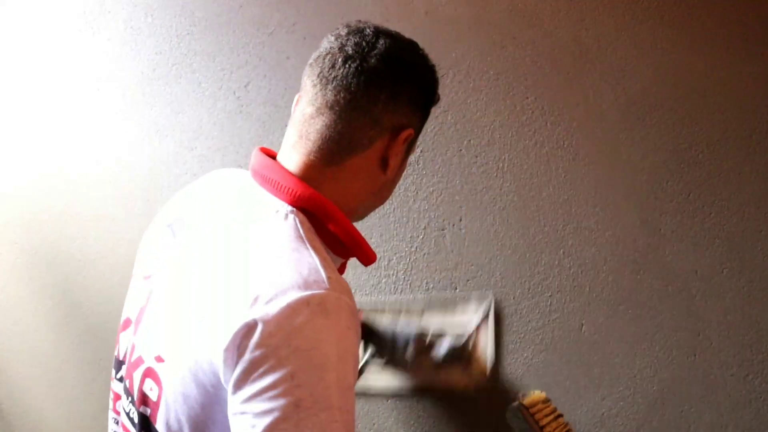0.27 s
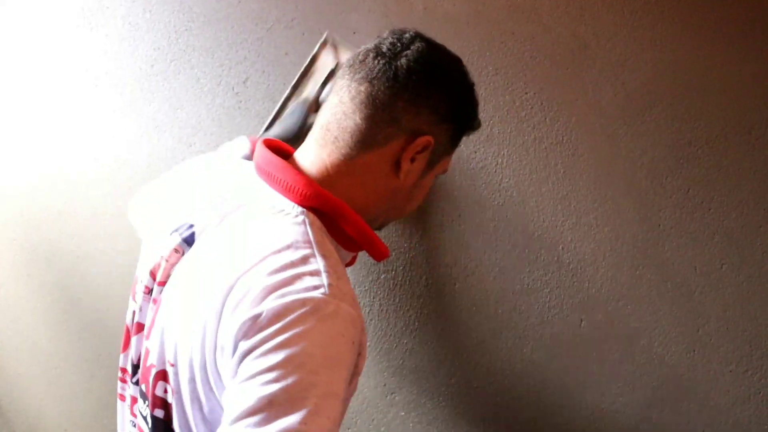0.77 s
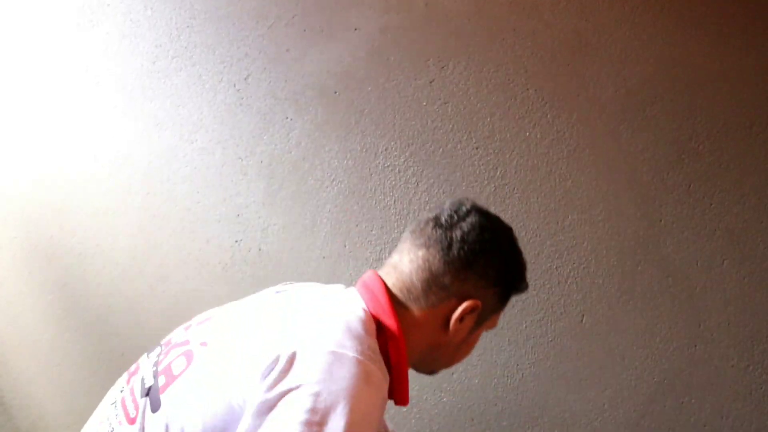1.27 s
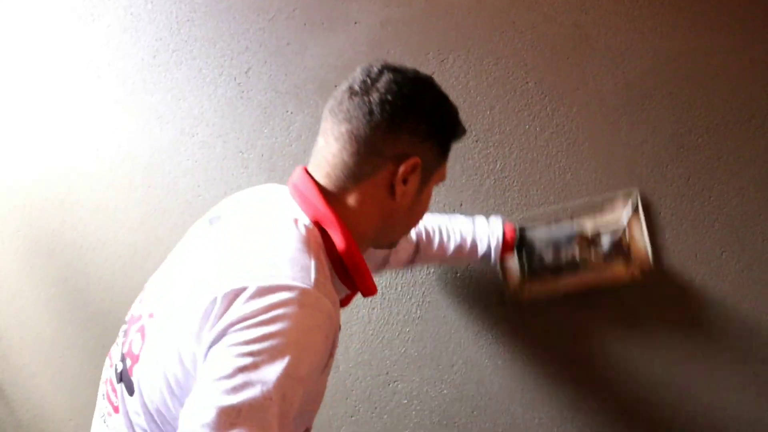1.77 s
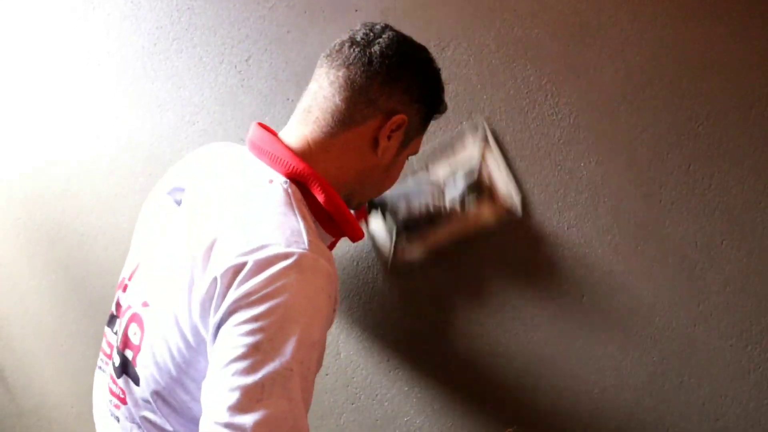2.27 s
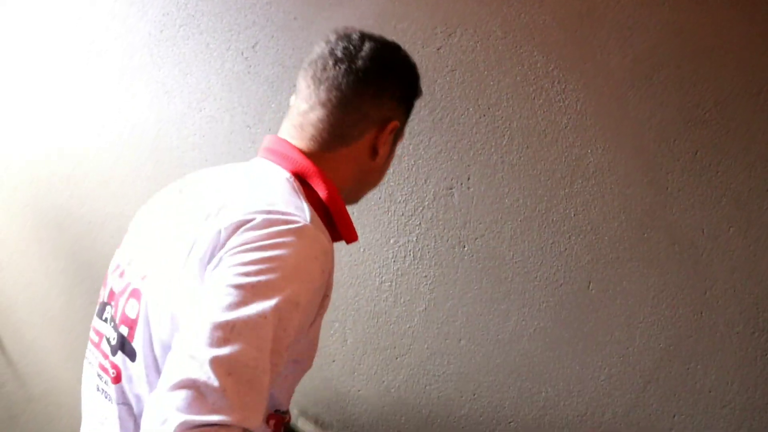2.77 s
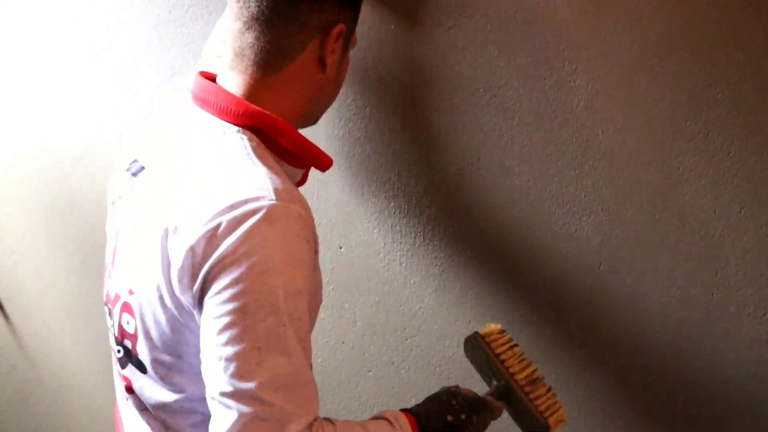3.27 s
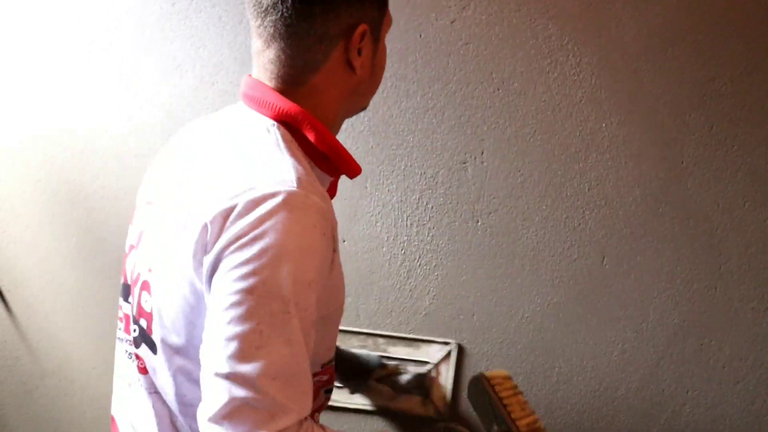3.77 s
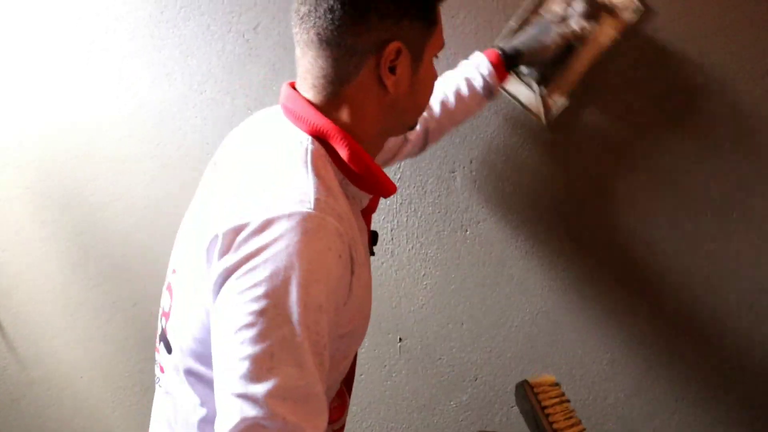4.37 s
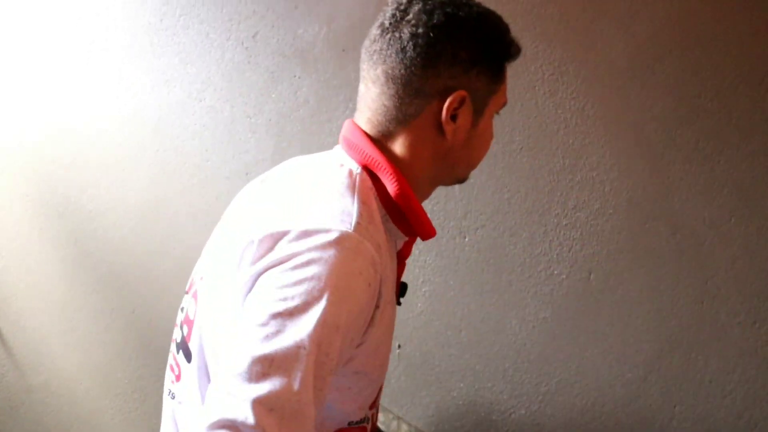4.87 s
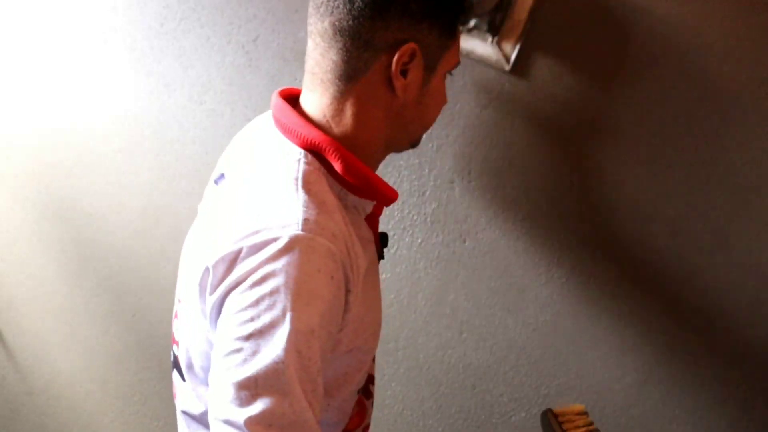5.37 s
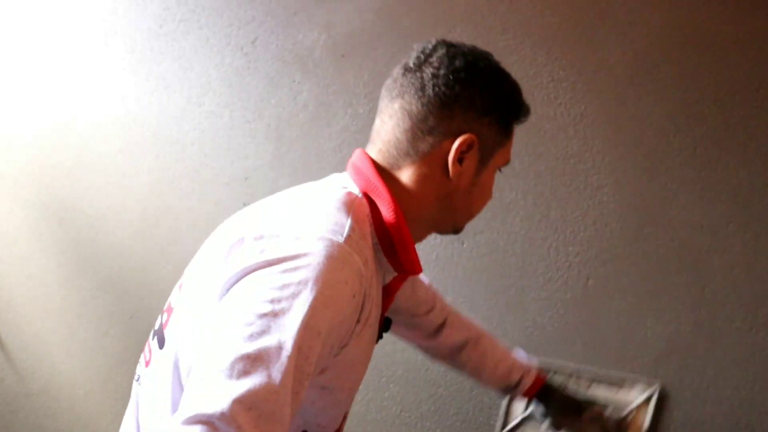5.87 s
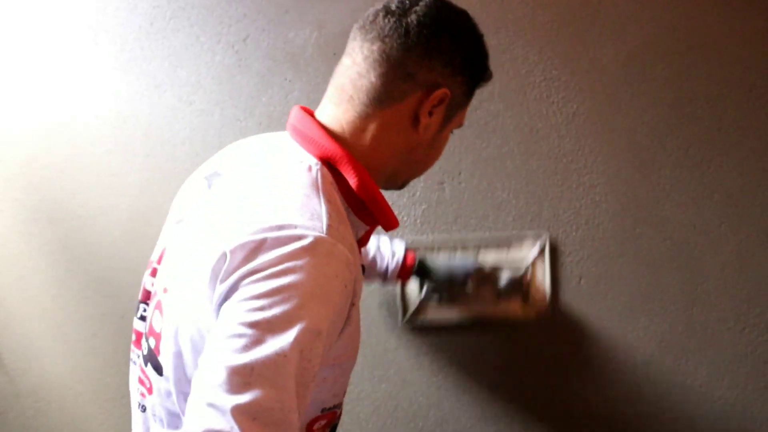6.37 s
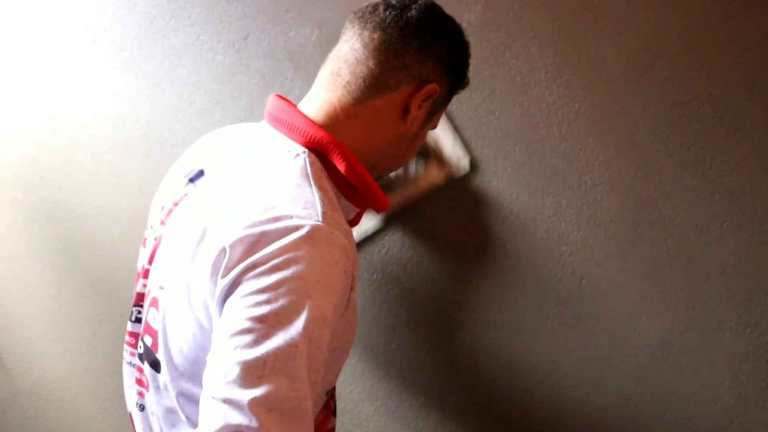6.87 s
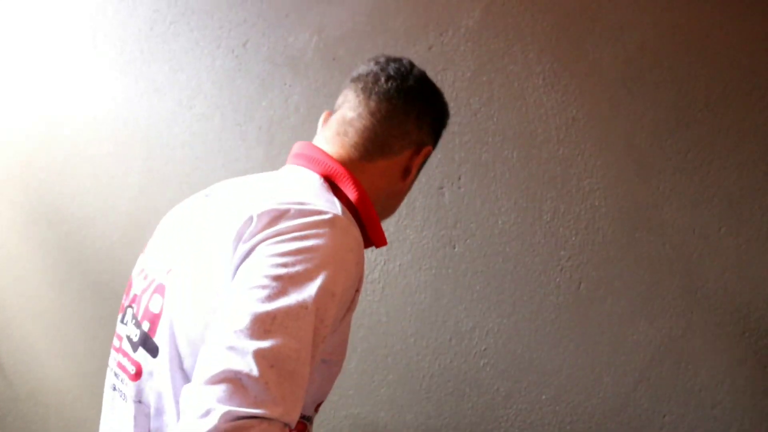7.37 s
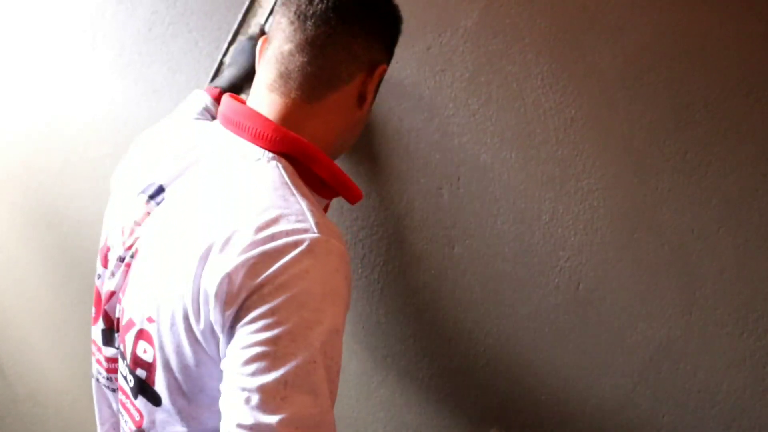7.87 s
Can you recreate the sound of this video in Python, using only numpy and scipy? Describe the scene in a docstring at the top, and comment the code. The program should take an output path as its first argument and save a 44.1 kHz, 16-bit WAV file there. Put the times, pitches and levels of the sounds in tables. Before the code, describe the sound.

Rhythmic gritty scraping on a plaster wall: strokes alternate up and down, irregular in length and force, some dull and hollow, others bright and sandy. Occasional hard grains snap under the edge. Gentle cloth thuds touch the chest microphone. A quiet bare room gives short reflections, and the final stroke grows markedly louder and harsher. The left side carries everything; the right is nearly silent.

```python
"""A gritty rasp swells and fades as a coarse hand float sweeps back and forth over fresh render in a bare room.
Friction is modelled as random grain impulses: filtered for rasp, hiss and grumble, or exciting the plate's modes
for a hollow ring. Decaying tones with noise crumbs make the sharp ticks of snagging grains.
Arm speed and the lean of the hand set the levels; a reflection and a sparse room tail follow.
A clip-on microphone on the plasterer's shirt, softly bumped, feeds the left channel; the right is nearly silent."""
import sys
import numpy as np
from scipy import signal
from scipy.fft import rfft, irfft
from scipy.io import wavfile
from scipy.ndimage import uniform_filter1d, map_coordinates

SR = 44100
rng = np.random.default_rng(int(sys.argv[2]) if len(sys.argv) > 2 else 0)


def dump(signal):
    """Clip the signal to [-1, 1] and save it as 16-bit WAV at the path in sys.argv[1]."""
    limited = np.clip(np.atleast_2d(signal).T, -1, 1)
    pcm = np.round(limited * 32767).astype(np.int16)
    wavfile.write(sys.argv[1], SR, pcm)


N = 358224
TIME = np.arange(N) / SR

# All levels in the tables are relative: later mixing gains apply.
# Strokes, upward and downward by turns: starting turn t/s, top speed t/s, share of speed kept through the turn
# (limited to 0.02-1), then at top speed rasp, plate ring, sharp sand, fine hiss and grumble level/dB
STROKES = [(-0.4, -0.17, 0.12, -28.5, -37, -26.0, -37, -49.0),
           (0.134, 0.285, 0.3, -26, -33, -26, -28, -46.5),
           (0.56, 0.948, 0.47, -27, -34.5, -32, -37.5, -53.5),
           (0.96, 1.12, 1.07, -27.5, -31.5, -31, -29.0, -52),
           (1.574, 1.818, 0.16, -31, -32.5, -28.5, -29.0, -44.5),
           (2.192, 2.328, 0.41, -24.5, -32.5, -28.5, -28.5, -46.5),
           (2.732, 3.105, 0.24, -30, -34.5, -24.5, -30, -46),
           (3.424, 3.66, 0.21, -27.5, -31.5, -29.0, -27, -43.5),
           (3.95, 4.168, 0.6, -27, -30.5, -26.5, -37.5, -44.5),
           (4.347, 4.5, 0.94, -29.5, -36.5, -35.5, -32, -54.5),
           (5.02, 5.212, 0.5, -28.5, -30.5, -28, -34, -40),
           (5.576, 5.77, 0.43, -32, -33, -32.5, -30.5, -48),
           (6.287, 6.49, 0.51, -24.5, -30.5, -28, -30.5, -39),
           (6.776, 7.017, 0.43, -31, -35, -28.5, -30, -47.5),
           (7.396, 7.708, 0.19, -24.5, -35.5, -25, -28.5, -42.5),
           (8.03, 8.31, 0.1, -17.5, -26.5, -15.5, -18.5, -48)]
LAST_TURN_S = 8.5  # where the last stroke ends
SPEED_POWER = 1.33  # speed follows a half sine to this power
# Response of each named layer to the arm: level/dB per tenfold speed, level/dB gained from foot to top of the sweep
ARM_RESPONSE = {"rasp": (17.7, 0.99), "plate": (15, .1), "sharp": (20.2, -2.4), "hiss": (29.3, -3.3),
                "grumble": (8.6, -7)}
# The hand leans on the float or eases off: centre t/s, half width t/s,
# change of rasp, plate ring, sharp sand and grumble level/dB
HAND_LEANS = [(0.288, 0.053, 2, 5, -2.5, 2), (0.787, 0.11, -3.5, -2.5, 3, 2),
              (1.179, 0.031, 3.5, 1.5, 3.5, 1.0), (1.295, 0.091, -2.5, -2, 1, -5),
              (1.984, 0.048, 5, 7.5, 3.5, 1), (2.328, 0.058, 0, 5.5, 1.0, -6),
              (2.434, 0.019, -0.5, 6.5, 1.0, 0.5), (3.086, 0.11, 6, 3.5, -1, 5),
              (3.331, 0.084, 3, -2, 1, -8), (3.638, 0.039, 1, 4.5, 5.5, 0), (4.527, 0.093, 2.5, 7, 4.5, 2),
              (5.317, 0.028, 4.5, 2.5, -0.5, 3), (5.5, 0.028, 6, -0.5, 0, 1),
              (5.73, 0.077, 9, 2.5, 3.0, -2.0), (6.586, 0.014, 3.5, 5, 3.5, -6),
              (6.683, 0.08, -2.5, 5.0, -0.5, 2), (6.969, 0.12, 5.5, 7, 1.5, 4),
              (7.833, 0.19, -3.5, 3.5, 1, 5), (8.025, 0.0096, -2, 0, 2, -7)]
# Modes of the float plate: f/Hz, level/dB, 60 dB decay time t/s
PLATE_MODES = [(670, -17, 0.15), (786, 9.5, 0.11), (875, 6.5, 0.13), (1230, -16, 0.09), (1320, -2, 0.085),
               (1490, 2, 0.13)]
# Gliding centre of the rasp's ringing core: t/s, f/Hz
RASP_CORE = [(0.0, 2500), (0.63, 2480), (0.83, 3140), (0.95, 2300), (1.87, 2920), (1.92, 2200),
             (3.12, 2820), (4.02, 2290), (4.12, 2840), (4.3, 1970), (5.27, 2600), (5.38, 1870),
             (5.59, 2480), (6.4, 2340), (6.53, 2760), (6.67, 2020), (7.78, 2860), (8.12, 2270)]
# Spectra of the contact sounds: f/Hz, level/dB (per Hz)
HOLLOW_SPECTRUM = [(300, -31), (450, -10.5), (650, -1.5), (850, 4.5), (1400, 5), (1750, 0.5), (2600, -25.5)]
RASP_SPECTRUM = [(800, -46.5), (1350, -12.5), (1750, -2.5), (2350, -1), (2850, -3), (3500, -7),
                 (5000, -30.5)]
SHARP_SPECTRUM = [(1800, -38.5), (2700, -7.5), (3400, -1), (4500, -1), (5800, -6), (7200, -13.5),
                  (11000, -28.5)]
HISS_SPECTRUM = [(4000, -23.5), (6200, -2.5), (7800, -0.5), (10500, 0.5), (12500, -2.5), (15500, -9.5)]
GRUMBLE_SPECTRUM = [(60, -14), (170, -16), (280, -8), (400, 0.5), (490, 3.5), (620, 7.5), (900, -22)]
# The finest hiss, above the split, gains this much over the rest from the foot of the sweep to its top
HISS_SPLIT_HZ, HISS_TILT_DB = 8300, 10.5
# The float passes behind the man's body: centre t/s, half width t/s, change of the finest hiss level/dB
BODY_SHADOWS = [(0.68, .09, 1), (3.79, 0.043, -5), (6.24, 0.051, -3), (7.06, 0.038, -5),
                (7.72, 0.057, -5.5)]
# Large grains that snag and snap under the edge: t/s, level/dB, snap f/Hz
GRAIN_SNAGS = [(0.202, -17.0, 2500), (0.803, -13.0, 2970), (0.929, -15.0, 2400), (1.586, -24.0, 2520),
               (2.343, -10.0, 2260), (3.063, -14.0, 2350), (4.07, -15.0, 2520), (5.478, -19.0, 2070),
               (6.584, -11.0, 1370), (7.022, -11.0, 1650), (7.608, -13.0, 2490), (8.053, -12.0, 1930)]
# Soft bumps of the shirt on the microphone: t/s, level/dB
SHIRT_BUMPS = [(0.028, -49), (0.448, -43), (0.94, -45), (1.185, -40), (1.857, -41), (2.05, -48),
               (2.43, -52), (3.813, -47), (3.888, -47), (4.872, -42), (5.072, -41), (5.85, -64.5),
               (6.16, -52), (6.976, -45)]
# Close reflection, gliding as arm and chest move: t/s, notch f/Hz, reflection strength (0-1)
CLOSE_REFLECTION = [(0.7, 9000, 0), (1.0, 5500, 0.17), (1.28, 2970, 0.4), (1.55, 1910, 0),
                    (1.82, 2100, 0.05), (2.0, 3900, 0.46), (2.2, 6900, 0.02), (2.6, 3240, 0.03),
                    (4.25, 7700, 0.22), (4.65, 2880, 0.02), (5.5, 6160, 0.12), (5.92, 3080, 0.03),
                    (6.65, 4510, 0.09), (6.9, 7500, 0.2)]
# Decay of the room: f/Hz, 60 dB decay time t/s
ROOM_DECAY = [(200, 0.26), (1000, 0.27), (4000, 0.064), (14000, 0.31)]
# Spectrum of the still room: f/Hz, level/dB (per Hz)
STILL_SPECTRUM = [(20, 6), (75, 22.5), (110, -20), (200, 18.5), (400, 19), (1000, -22), (15000, -38)]
EDGE_HZ = 15720  # upper band limit of the recorder


def scrape(level, height, focus_width_hz=1200, focus_db=-4):
    """Granular friction: coarse and fine sand under one plate, whose grip judders on the uneven render."""
    judder = wander(hz=84)
    coarse = coloured(grains(per_s=3500, spread_db=1.5), HOLLOW_SPECTRUM)
    ring = evened(plate_ring(grains(per_s=2500, spread_db=4.0)))
    hollow = evened(coarse + gain_of(-13.5) * ring)
    # now and then a bigger grain cracks, heard in both middle registers at once
    cracks = gain_of(-16.5) * evened(grains(per_s=70, spread_db=1.5))
    rasp = coloured(evened(grains(per_s=8000, spread_db=3.0)) + cracks, RASP_SPECTRUM)
    sharp = coloured(evened(grains(per_s=14000, spread_db=2.5)) + cracks / 2, SHARP_SPECTRUM)
    # the rasp's ringing core glides in pitch along the RASP_CORE table
    core_hz = curves(RASP_CORE)[0]
    core = grains(per_s=5000, spread_db=3.0)
    for _ in range(2):
        core = resonate(core, core_hz, focus_width_hz)
    core_db = (level["rasp"] + level["sharp"]) / 2 + focus_db
    layers = [(hollow, level["plate"], .9),  # (sound, level/dB, judder depth/dB)
              (rasp, level["rasp"] - 0.85, .9),
              (evened(core), core_db, .8),
              (sharp, level["sharp"] - .2, .6),
              (hiss(height), level["hiss"] + 0.12, .6)]
    return sum(sound * gain_of(db + judder_db * judder) for sound, db, judder_db in layers)


def sweep():
    """Pendulum-like motion, slowing at each turn: speed and height on the wall, both 0-1."""
    turn_s, fastest_s, kept = np.transpose(STROKES)[:3]
    marks = np.append(np.column_stack([turn_s, fastest_s]), LAST_TURN_S)
    phase = np.pi * np.interp(TIME, marks, np.arange(len(marks)) / 2)  # half a cycle per stroke
    kept = np.interp(TIME, turn_s, np.clip(kept, .02, 1))
    speed = kept + (1 - kept) * abs(np.sin(phase)) ** SPEED_POWER
    height = np.sin(phase / 2) ** 2
    return speed, height


def levels(speed, height):
    """Friction level as a power law of speed, with each layer shifted by stroke, height and lean of the hand."""
    _, fastest_s, _, *strengths = np.transpose(STROKES)
    level = {}
    for (name, (speed_db, height_db)), stroke_db in zip(ARM_RESPONSE.items(), strengths):
        strength = np.interp(TIME, fastest_s, stroke_db)
        level[name] = strength + speed_db * np.log10(speed) + height_db * (height - .5)
    for s, width, *changes in HAND_LEANS:
        for name, db in zip(("rasp", "plate", "sharp", "grumble"), changes):
            level[name] = level[name] + db * swell(s, width)
    return level


def grains(per_s, spread_db):
    """Random impulse train: clicks of sand of either sign, many small, a few large."""
    size = gain_of(spread_db * np.minimum(rng.exponential(1, N), 4.6))
    return size * rng.choice([-1, 1], N) * (rng.random(N) < per_s / SR)


def plate_ring(x):
    """Modal superposition: the decaying modes of the float plate, excited by x."""
    t = np.arange(SR // 10) / SR
    ring = np.zeros(len(t))
    for hz, db, t60 in PLATE_MODES:
        decay = np.exp(-np.log(1000) * t / t60)
        ring += gain_of(db) / np.sqrt(t60) * decay * np.sin(2 * np.pi * hz * t)
    return signal.oaconvolve(x, ring / np.linalg.norm(ring))[:N]


def hiss(height):
    """Acoustic shadowing: the body shades the finest sand when the float is low on the wall or behind him."""
    sand = coloured(grains(per_s=16000, spread_db=3.0), HISS_SPECTRUM)
    lower = signal.sosfiltfilt(signal.butter(2, HISS_SPLIT_HZ, fs=SR, output="sos"), sand)
    tilt = gain_of(HISS_TILT_DB * (height - .5) / 2)
    shade = gain_of(sum(db * swell(s, width) for s, width, db in BODY_SHADOWS))
    return lower / tilt + (sand - lower) * tilt * shade


def patchy(x, depth_db=1.15):
    """Shifting points of contact: random patches of the spectrum swell and fade."""
    z = signal.stft(x, SR, nperseg=512, noverlap=384)[2]
    field = uniform_filter1d(rng.standard_normal(z.shape), size=7, axis=0)  # smooth over frequency
    field = uniform_filter1d(field, size=12, axis=1)  # and over time
    return signal.istft(z * gain_of(depth_db * evened(field)), SR, nperseg=512, noverlap=384)[1][:N]


def drag(level_db):
    """Low-passed granular friction: the dull grumble under the strokes."""
    return gain_of(level_db - 1.5) * coloured(grains(per_s=1800, spread_db=5.0), GRUMBLE_SPECTRUM)


def snags():
    """Impulsive fracture: a large grain snaps, crumbles for a few milliseconds and knocks the plate."""
    out, t = np.zeros(N), np.arange(SR // 40) / SR
    for s, db, hz in GRAIN_SNAGS:
        snap = .65 * np.exp(-t / .0017) * np.sin(2 * np.pi * hz * t)
        band = signal.butter(2, [hz / 2, 2 * hz], "bandpass", fs=SR)
        noise = evened(signal.lfilter(*band, rng.standard_normal(len(t))))
        crumbs = .22 * np.exp(-t / .004) * noise
        add(out, s, gain_of(db) * (snap + crumbs))
    return out + 0.029 * plate_ring(out)


def bumps(swell_s=.018, thud_hz=65, thud_db=-3, puff_db=-5):
    """Contact noise: the shirt tugs the microphone, a short low thud inside a puff of cloth noise."""
    out, t = np.zeros(N), np.arange(SR // 4) / SR
    push = (t / swell_s * np.exp(1 - t / swell_s)) ** 2
    cloth = coloured(rng.standard_normal(N), [(20, -6), (55, 2), (110, -2), (170, -4), (270, -16)])
    for s, db in SHIRT_BUMPS:
        thud = gain_of(thud_db) * np.sin(2 * np.pi * thud_hz * t)
        puff = gain_of(puff_db) * cloth[round(s * SR):][:len(t)]
        add(out, s + swell_s / 2, gain_of(db) * push * (thud + puff))
    return out


def near_echo(x, soft_hz=7000):
    """Comb interference: a reflection half a cycle late at the notch frequency; cloth soaks up its treble."""
    notch_hz, strength = curves(CLOSE_REFLECTION)
    dull = signal.sosfiltfilt(signal.butter(2, soft_hz, fs=SR, output="sos"), x)
    late = map_coordinates(dull, [np.arange(N) - SR / (2 * notch_hz)], order=3)
    return (x + strength * late) / np.sqrt(1 + strength ** 2)


def room(x, count=4):
    """Time-varying reverberation: the reflections change as the float and the man move."""
    shares = np.array([wander(hz=2.8) for _ in range(count)])
    shares /= np.linalg.norm(shares, axis=0)
    return sum(signal.fftconvolve(x * share, room_tail())[:N] for share in shares)


def room_tail():
    """Frequency-dependent decay: sparse reflections off bare walls, each band dying at its own rate."""
    taps = rng.standard_normal(SR) * (rng.random(SR) < 2500 / SR)
    taps = taps * (np.arange(SR) > .006 * SR)  # nothing arrives in the first 6 ms
    hz, t, z = signal.stft(taps, SR, nperseg=256)
    decay = np.exp(-np.log(1000) * t / read(ROOM_DECAY, hz)[:, None])
    tail = signal.istft(z * decay, SR, nperseg=256)[1]
    return tail / np.linalg.norm(tail)


def still_room():
    """Stationary filtered noise: the mostly low-pitched background of the still room, rms 1."""
    return coloured(rng.standard_normal(N), STILL_SPECTRUM)


def gain_of(db):
    """Logarithmic level law: decibels to amplitude."""
    return 10 ** (np.asarray(db) / 20)


def evened(x):
    """Power normalisation: scales to rms 1."""
    return x / np.sqrt(np.mean(x ** 2) + 1e-20)


def read(points, hz):
    """Linear interpolation on a log-frequency axis."""
    f, value = np.transpose(points)
    return np.interp(np.log(hz + 1), np.log(f + 1), value)


def curves(rows):
    """Linear interpolation in time: each column of a table as a value per sample."""
    s, *columns = np.transpose(rows)
    return [np.interp(TIME, s, column) for column in columns]


def swell(s, width):
    """Gaussian envelope: a bell-shaped rise and fall around time s, 0-1."""
    return np.exp(-.5 * ((TIME - s) / width) ** 2)


def add(mix, s, sound):
    """Superposition: mixes a sound in at time s."""
    part = mix[max(round(s * SR), 0):][:len(sound)]
    part += sound[:len(part)]


def coloured(x, spectrum, size=4096):
    """Minimum-phase filtering to the given spectrum, with added rolloff above its last point; rms 1."""
    hz = abs(np.fft.fftfreq(size, 1 / SR))
    rolloff = 2 * np.log(np.maximum(hz / spectrum[-1][0], 1))
    log_gain = np.log(gain_of(read(spectrum, hz))) - rolloff
    # the Hilbert transform of the log gain gives the phase of a causal filter
    taps = np.fft.ifft(np.exp(np.conj(signal.hilbert(log_gain)))).real
    return evened(signal.oaconvolve(x, taps[:size // 2])[:N])


def wander(hz):
    """Band-limited random modulation of rms 1, up to about hz changes a second."""
    f = np.fft.rfftfreq(N, 1 / SR)
    band = f / (f + hz / 10) / (1 + (f / hz) ** 2)
    return evened(irfft(rfft(rng.standard_normal(N)) * band, N))


def resonate(x, hz, width_hz):
    """Heterodyne resonance following the curve hz: shift down to zero, smooth, shift back."""
    turn = np.exp(2j * np.pi * np.cumsum(hz) / SR)
    r = np.exp(-np.pi * width_hz / SR)
    return 2 * (turn * signal.lfilter([1 - r], [1, -r], x / turn)).real


def scene():
    """Superposition at the chest: the float on the wall, with the room behind it."""
    speed, height = sweep()
    level = levels(speed, height)
    work = patchy(scrape(level, height)) + drag(level["grumble"]) + snags()
    heard = near_echo(work) + gain_of(-11.0) * room(work)
    left = gain_of(5.5) * (heard + bumps() + gain_of(-61.5) * still_room())
    right = gain_of(-64.0) * left + gain_of(-87.5) * still_room()  # only crosstalk and faint noise
    return np.array([left, right])


def record(dry):
    """Linear-phase low-pass filtering: the recorder's band limit."""
    taps = signal.firwin(801, EDGE_HZ, window=("kaiser", 9), fs=SR)
    return signal.oaconvolve(dry, taps[None], "same")


dry = scene()
out = record(dry)
dump(out)
```